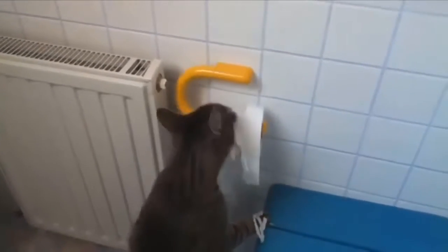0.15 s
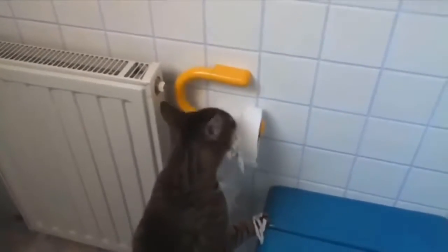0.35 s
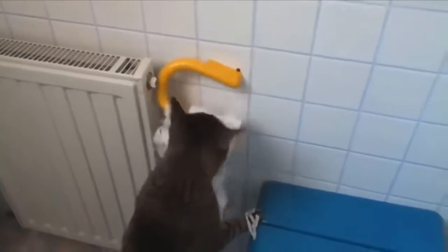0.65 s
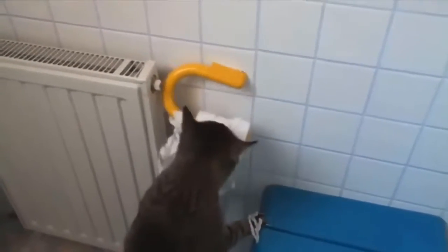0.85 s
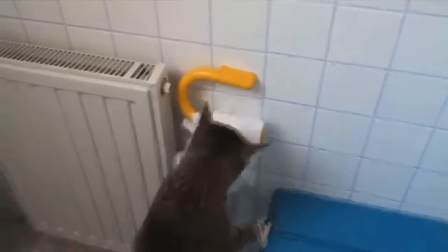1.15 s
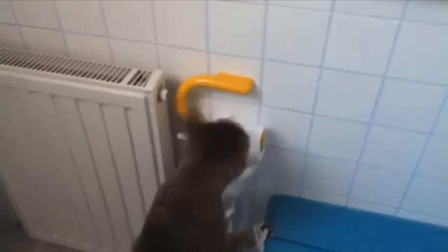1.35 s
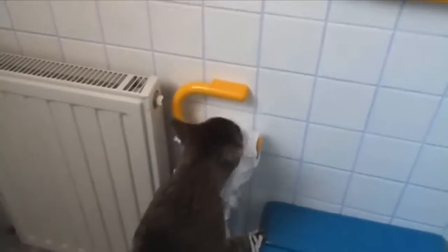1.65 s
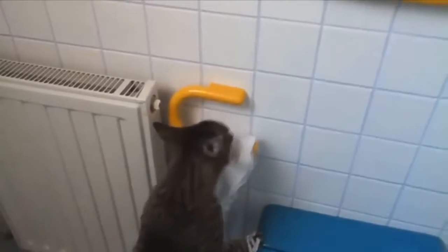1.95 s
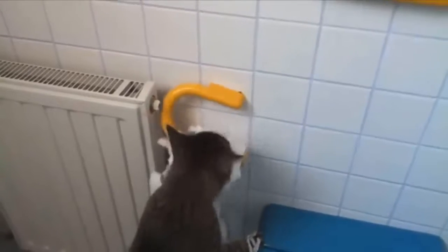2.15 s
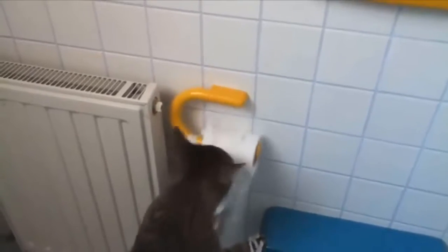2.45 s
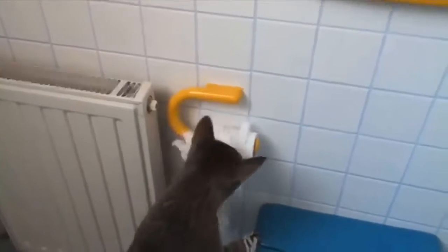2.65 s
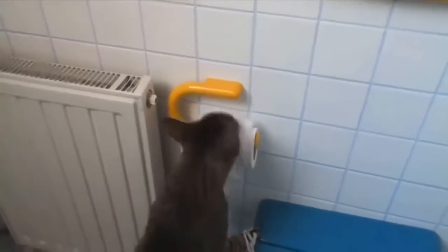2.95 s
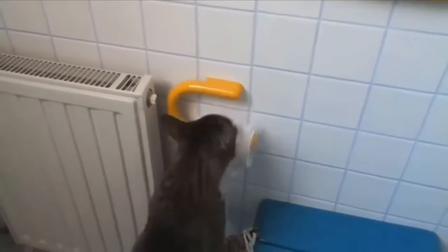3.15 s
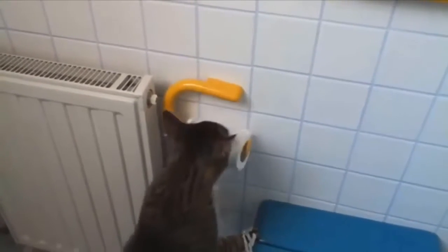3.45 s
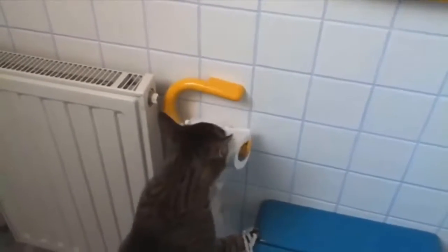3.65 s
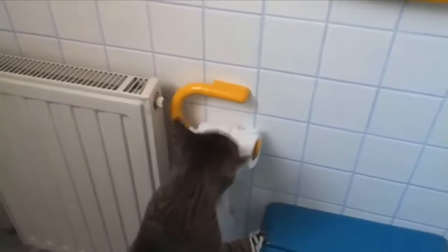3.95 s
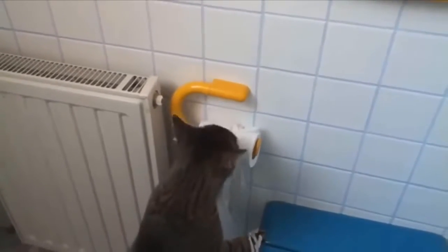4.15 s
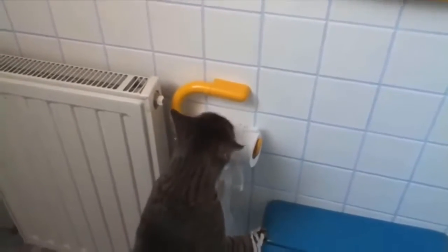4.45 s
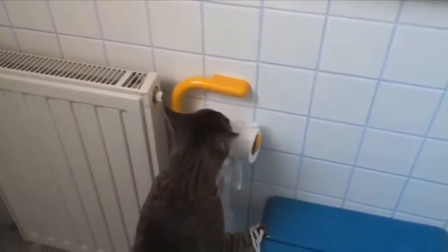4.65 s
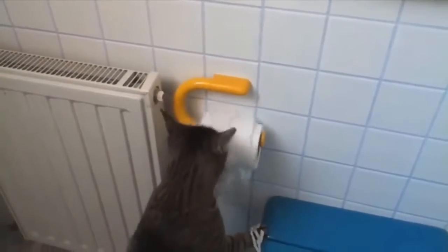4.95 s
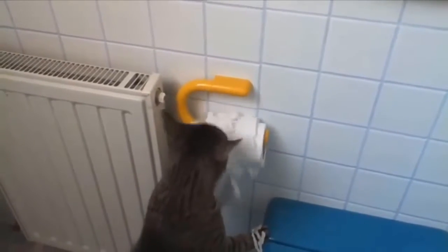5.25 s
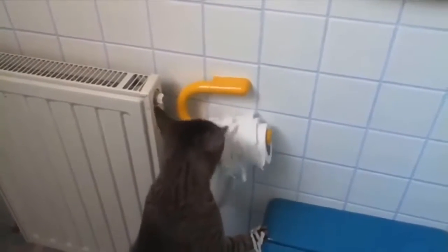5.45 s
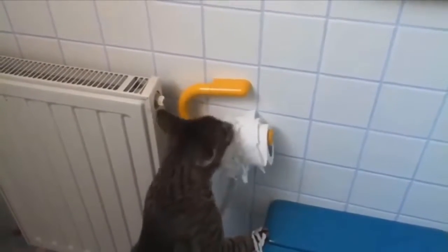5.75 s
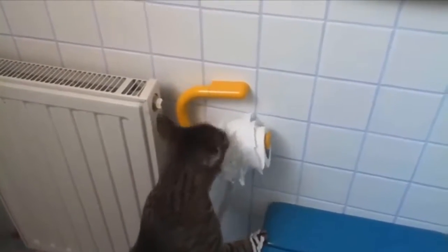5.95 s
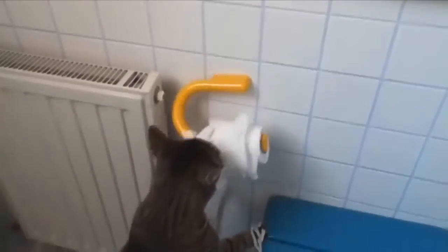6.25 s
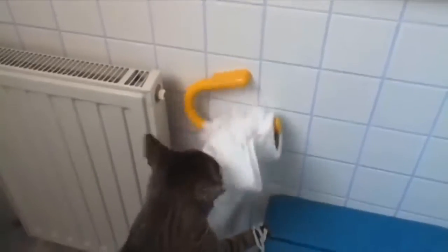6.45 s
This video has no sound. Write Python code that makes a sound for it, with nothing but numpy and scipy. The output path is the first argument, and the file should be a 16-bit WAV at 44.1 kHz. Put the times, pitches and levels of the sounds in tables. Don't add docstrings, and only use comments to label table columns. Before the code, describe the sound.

A cat paws at a toilet roll on a plastic wall holder. Quick tearing swipes and thuds open, then lighter dragging rustles with hollow cardboard scrapes. Hard clunks return around 1.6, 2.8, 4.2 and 5.5 seconds, with dry claw ticks between. A small tiled room adds a short echo; a phone microphone adds low, steady hiss, faint high whistles and one soft finger tap.

```python
import sys
import numpy as np
from scipy import signal
from scipy.fft import rfft, irfft
from scipy.io import wavfile

SR = 44100
rng = np.random.default_rng(int(sys.argv[2]) if len(sys.argv) > 2 else 0)


def voltage_ratio(level):
    return 10 ** (np.asarray(level, float) / 20)


def persist_wave(psi):
    counts = np.round(np.clip(psi, -1, 1) * 32767).astype(np.int16)
    wavfile.write(sys.argv[1], SR, np.atleast_2d(counts).T)


N = 291060
STEP = 32


def rms_one(x):
    return x / np.sqrt(np.mean(x ** 2) + 1e-20)


def at_hz(points, hz):
    points = np.array(points)
    return np.interp(np.log(hz), np.log(points[:, 0]), points[:, 1])


def drift(rate_hz):
    r = np.exp(-80 * np.pi * rate_hz / SR)
    slow = signal.lfilter([1], [1, -2 * r, r * r], rng.standard_normal(N // 40 + 2002))[2000:]
    return np.interp(np.arange(N) / 40, np.arange(len(slow)), rms_one(slow))


def ring(x, hz, t60_s):
    r = voltage_ratio(-60 / (t60_s * SR))
    w = 2 * np.pi * hz / SR
    return signal.lfilter([0, np.sin(w)], [1, -2 * r * np.cos(w), r * r], x + 1e-18)


def bands(x, low_hz, count):
    edges_hz = low_hz * 2 ** (np.arange(count + 1) / 3)
    for k, (low, high) in enumerate(zip(edges_hz, edges_hz[1:])):
        sos = signal.butter(2, [low, high], "band", fs=SR, output="sos")
        yield np.sqrt(low * high), (-1) ** k * signal.sosfilt(sos, x)


def grains(per_s, spread_db):
    sizes = voltage_ratio(spread_db * np.minimum(rng.exponential(1, N), 2.2)) * rng.choice([-1, 1], N)
    return rms_one(sizes * (rng.random(N) < per_s / SR))


def microphone_noise():
    # frequency in Hz, hiss density in dB.
    hiss_curve = [(15, -42), (25, -13), (63, 4.5), (102, 5.5), (309, 2), (460, -5), (761, -11.5),
                  (1290, -10), (2080, -14.5), (2440, -10.5), (7420, -12.5), (11300, -17), (13300, -20.5),
                  (15500, -17.5)]
    # frequency in Hz, level in dB rms.
    whistles = [
        (11084, -83),
        (14979, -73),
    ]
    hz = np.maximum(np.fft.rfftfreq(N, 1 / SR), 10)
    spectrum = rfft(rng.standard_normal(N)) * voltage_ratio(at_hz(hiss_curve, hz))
    hiss = rms_one(irfft(spectrum, N))
    t = np.arange(N) / SR
    tones = sum(np.sqrt(2) * voltage_ratio(db) * np.sin(2 * np.pi * tone_hz * t) for tone_hz, db in whistles)
    return voltage_ratio(-56.5) * hiss + tones


def holder(shaking_db, blows):
    # time in seconds, peak in dB, pitch in Hz.
    thuds = [(0.001, -22.5, 296), (0.136, -27, 405), (0.202, -20.5, 383), (0.276, -19, 327),
             (1.643, -14.5, 307), (1.657, -13.5, 194), (1.678, -19, 280), (1.726, -30, 182),
             (1.751, -30, 70), (2.859, -24, 70), (5.499, -26, 70), (1.42, -34.5, 130), (2.845, -21.5, 368),
             (2.918, -16, 316), (3.036, -20, 263), (4.275, -21.5, 368), (5.461, -24.5, 262),
             (5.495, -24, 298), (5.717, -33, 280), (5.741, -23.5, 300), (6.576, -30.5, 370)]
    # frequency in Hz, level in dB, t60 in seconds.
    wall_modes = [(63, -5, 0.2), (129, -27, 0.2), (161, -32, 0.2), (188, -12.5, 0.2), (223, -17, 0.19),
                  (248, -18, 0.11), (273, -3, 0.14), (286, -10.5, 0.15), (313, 1.5, 0.1),
                  (337.4, -1, 0.071), (368, 5, 0.079), (460, -7.5, 0.062), (519, -15, 0.1),
                  (593, -12, 0.06)]
    longest_s = .14
    rumble = voltage_ratio(shaking_db - 43.5) * grains(600, spread_db=-1.0) + voltage_ratio(-45.0) * blows
    at = [round(row[0] * SR) for row in thuds]
    peak_db = np.array(thuds)[:, 1]
    chance = rng.standard_normal((len(thuds), len(wall_modes)))
    out = np.zeros(N)
    for (hz, db, t60_s), own in zip(wall_modes, chance.T):
        near_db = [-8 * abs(np.log2(hz / thud_hz)) for _, _, thud_hz in thuds]
        pushes = np.zeros(N)
        pushes[at] = voltage_ratio(peak_db + near_db + 2.0 * own - 12.5)
        out += voltage_ratio(db) * ring(pushes + rumble, hz, min(t60_s, longest_s))
    padded = signal.butter(1, 700, fs=SR, output="sos")
    return signal.sosfilt(padded, out)


def swell(s, db, rise_s, fall_s):
    late = np.arange(0, N + STEP, STEP) / SR - s
    down_db = 20 * np.where(late < 0, -late / rise_s, late / fall_s)
    return voltage_ratio(2 * (db - down_db)) + 1e-30


def pawing():
    # peak in seconds, paper level in dB, rise and fall in seconds, brightness in dB at 5 kHz.
    swipes = [(.002, -39.5, 0.016, 0.22, -3.5), (0.119, -27, 0.017, 0.2, -13),
              (.194, -36.5, 0.052, 0.12, -8), (0.261, -26.5, 0.0089, 0.069, -21.5),
              (.33, -45, .1, 0.045, -15.5), (1.586, -42, 0.0033, 0.018, -9), (1.6, -32, 0.013, 0.12, -7),
              (1.618, -30.5, 0.026, 0.08, -1.5), (1.645, -28, 0.056, 0.051, -4.5),
              (1.703, -39, 0.014, 0.12, -8.5), (2.79, -43, 0.037, 0.038, 12),
              (2.802, -24, 0.015, 0.18, -13), (2.908, -25.5, 0.11, 0.023, -12),
              (2.994, -54, .06, 0.067, -10), (3.035, -35.5, 0.13, 0.057, -9),
              (3.816, -37, 0.0033, 0.07, -7), (4.08, -26, 0.025, 0.038, -14),
              (4.228, -25.5, 0.018, 0.073, -6.5), (4.258, -31, 0.044, 0.031, -9),
              (4.29, -53, 0.06, 0.53, -8.5), (5.392, -46, .012, 0.27, 39), (5.48, -34.5, 0.35, 0.15, -8.5),
              (5.721, -37, 0.021, 0.087, -9), (5.77, -48, 0.15, 0.17, -1.5),
              (6.095, -46.5, 0.0033, 0.17, -1.5), (6.548, -36.5, 0.057, 0.85, -6)]
    drags = [(.655, -42.5, 0.023, 0.05, -23), (.682, -47.5, .006, .3, -19.5), (.826, -40.5, 0.28, 0.33, -8),
             (.94, -47.5, 0.94, 0.031, -6.5), (1.102, -46, 0.16, 0.23, -5), (1.342, -50, 0.68, 0.13, -4.5),
             (1.37, -44.5, 0.0078, 0.26, -5), (1.41, -41.5, 0.11, 0.041, -2.5),
             (1.28, -42.5, .05, .05, -4.5), (1.045, -49, 0.033, 0.04, 2), (2.199, -44, 0.12, 0.058, -7.5),
             (2.425, -46.5, 0.15, 0.27, 0.5), (2.483, -39.5, 0.088, 0.17, -8),
             (2.585, -39, 0.11, 0.063, -11), (3.428, -48.5, 0.3, 0.11, -9), (3.77, -37.5, 0.22, 0.15, -8.5),
             (4.065, -42, 0.11, 0.039, -3), (4.205, -44, 0.45, .05, -7), (4.602, -53, 0.032, 0.23, -8),
             (4.836, -52, 0.25, 0.25, -12.5), (4.37, -43.5, 0.35, 0.1, -4.5), (5.695, -47, 0.11, .1, -4),
             (5.88, -46, 0.27, 0.084, -4), (6.256, -50, 0.75, 0.94, -9.5), (6.404, -46, 0.29, 0.22, -8),
             (6.5, -51.5, .3, 0.15, 1)]
    scours = [
        (.55, -45, 0.14, 0.13, -11),
        (2.33, -48.5, 0.11, 1, -11.5),
        (2.687, -46, 0.52, 0.14, -6),
        (4.982, -46, 0.099, 0.18, -19),
        (5.194, -43.5, 0.25, 1, -16.5),
        (5.34, -45.5, 0.6, 0.18, 3),
    ]
    # peak in seconds, paper level in dB, fall in seconds, brightness in dB at 5 kHz.
    pats = [
        (.496, -61, 0.1, -29),
        (1.891, -51, 0.15, -10.5),
        (2.057, -38.5, 0.054, -8.5),
        (3.306, -47.5, 1, -7),
        (3.556, -46.5, 0.37, -11),
        (3.924, -35, 0.076, -9.5),
        (6.006, -49, 0.16, -6.5),
        (6.432, -40, 0.092, -2.5),
    ]
    # peak in seconds, level in dB, rise and fall in seconds.
    shakes = [(.002, -32, .01, 0.18), (.062, -48, .03, 0.071), (.16, -22, 0.05, 0.14),
              (.248, -22, 0.097, 0.028), (.288, -19, 0.056, 0.1), (.35, -39, .05, 0.087),
              (1.102, -38, 0.13, 0.15), (1.639, -12.5, 0.028, 0.027), (2.199, -44, 0.057, 0.044),
              (2.82, -17, 0.017, 0.18), (2.908, -47, 0.17, 0.11), (3.042, -20, 0.11, .08),
              (3.791, -59, 0.6, 0.032), (4.075, -49, .02, 0.13), (4.234, -19.5, 0.0098, 0.12),
              (5.472, -30, 0.027, 0.29), (5.713, -19, 0.0051, 0.013), (5.743, -23.5, 0.021, 0.095),
              (6.094, -41.5, 0.039, 0.063), (6.404, -41.5, 0.27, 0.044), (6.57, -54, 0.025, .3)]
    pat_rise_s = 0.039
    full_pats = [(s, db, pat_rise_s, fall_s, bright_db) for s, db, fall_s, bright_db in pats]
    kinds = [(swipes, -6), (drags, -0.5), (scours, 3.5), (full_pats, 0.5)]
    power, bright, core = 0, 0, 0
    for strokes, core_db in kinds:
        for s, db, rise_s, fall_s, bright_db in strokes:
            one = swell(s, db, rise_s, fall_s)
            power = power + one
            bright = bright + one * bright_db
            core = core + one * core_db
    shaking = voltage_ratio(2 * -7.5) * power + sum(swell(*row) for row in shakes)
    controls = 10 * np.log10(power), bright / power, 10 * np.log10(shaking), core / power
    return [np.interp(np.arange(N) / STEP, np.arange(len(c)), c) for c in controls]


def paper(level_db, bright_db, core_db):
    # frequency in Hz, density in dB per Hz.
    rustle = [(210, -30), (350, 8.5), (479, 6), (1440, 3), (1660, 14.5), (1820, 8), (3020, 4), (4000, -5),
              (4760, -4), (5840, -8.5), (8380, -12.5), (14300, -28), (15000, -31)]
    # frequency in Hz, width in Hz, level in dB.
    core_modes = [
        (1060, 190, -28),
        (1250, 140, -16),
        (1470, 175, -11),
        (1750, 440, -8.5),
        (2290, 330, -12.5),
    ]
    flutter_db = 1.5 * drift(30) + 1.2 * drift(12)
    snapping = np.clip((level_db + 56) / 16, .3, 1)
    snaps = grains(900 * voltage_ratio(4 * drift(25)), spread_db=3.5)
    fibres = rng.standard_normal(N) + snapping * snaps
    fibres *= voltage_ratio(level_db + flutter_db) / np.sqrt(1 + snapping ** 2)

    hollow = voltage_ratio(1.01 * np.clip(core_db, -12, 4) + 6)
    hollow_ring = sum(voltage_ratio(db - 25) * ring(fibres, hz, 1.16 / width_hz) for hz, width_hz, db in core_modes)
    fibres = (fibres + hollow * hollow_ring) / np.sqrt(1 + hollow ** 2)

    out = np.zeros(N)
    for hz, part in bands(fibres, 334.0, count=16):
        patch_db = 1.6 * drift(6)
        reach = np.clip(np.log2(hz / 1600) / 1.21, 0, 1.1)
        lift_db = reach * (bright_db + 7.5 + 20 * np.log10(1 + hollow ** 2) / 2)
        thin_db = -7 * np.clip(np.log2(1000 / hz), 0, 1) * np.clip((-27.0 - level_db) / 8, 0, 1)
        out += part * voltage_ratio(at_hz(rustle, hz) + lift_db + thin_db + patch_db)
    return out


def bathroom(x):
    # frequency in Hz, t60 in seconds.
    decay = [
        (250, 0.38),
        (1000, 0.24),
        (3000, 0.084),
        (9000, 0.061),
    ]
    t = np.arange(SR // 2) / SR
    tail = 0
    for hz, part in bands(rng.standard_normal(len(t)), 107.2, count=21):
        tail = tail + part * voltage_ratio(-60 * t / at_hz(decay, hz))
    tail = tail * np.clip((t - .004) / 0.0015, 0, 1)
    return signal.fftconvolve(x, tail / np.sqrt(np.sum(tail ** 2)))[:N]


def claw_ticks():
    # time in seconds, peak in dB, pitch in Hz, cycles of ring.
    dry_ticks = [(.064, -20, 900, 1.2), (.1793, -13, 1900, 1.2), (.496, -36, 2100, 2.5),
                 (.26, -19, 1850, 4), (2.41, -30, 1010, 3), (5.72, -27, 1260, 2.5), (2.056, -35, 2240, 2),
                 (3.552, -41, 816, 2), (1.045, -37, 2500, 1.2), (.651, -40, 2000, 1.5),
                 (.678, -29, 1450, 1.8), (1.584, -30, 2600, 1.2), (1.701, -22, 1310, 1.6),
                 (2.984, -20, 1600, 1.4), (3.013, -23, 1500, 1.4), (3.8135, -18, 1760, 10),
                 (3.8135, -33, 5000, 8), (1.367, -35, 2290, 2), (5.388, -30, 1770, 3),
                 (4.07, -21, 600, 1.6), (4.588, -43, 1300, 1.6), (4.701, -39, 1940, 1.6),
                 (5.428, -24, 1280, 1.5), (5.569, -25, 1770, 2), (5.951, -39, 2230, 1.6),
                 (6.0925, -28, 1500, 1), (6.541, -24, 1000, 1.3)]
    pings = [
        (2.8726, -36, 5600, 26),
        (2.892, -28, 5500, 18),
    ]
    events = dry_ticks + pings
    t = np.arange(600) / SR
    fizz = rng.standard_normal((len(events), len(t)))
    out = np.zeros(N)
    for (s, db, hz, cycles), rough in zip(events, fizz):
        spike = np.sin(2 * np.pi * hz * t) * np.exp(-(t * hz / cycles) ** 1.6)
        tick = spike + .3 * rough * np.exp(-t / .0012)
        i = round((s + .002) * SR)
        out[i:i + len(t)] += voltage_ratio(db) * tick / np.max(np.abs(tick))
    return signal.sosfilt(signal.butter(4, 7500, fs=SR, output="sos"), out)


def knocks():
    # time in seconds, peak in dB, ring in Hz, crack share in dB.
    hard = [(0.12, -31, 1870, 4.5), (0.18, -22, 1186, -6), (0.184, -20, 1275, 1), (0.263, -20, 1256, -36),
            (1.627, -25, 690, -10), (1.634, -18.5, 1530, -10), (1.643, -46, 506, -18),
            (2.8, -9.5, 1000, -14.5), (2.803, -11.5, 566, -20), (2.871, -21, 890, -13),
            (4.071, -25, 735, -12), (4.072, -27, 1690, -8), (4.222, -24, 1064, -8), (5.39, -27, 1930, -14),
            (5.723, -33, 1350, -21), (6.094, -39, 500, 10.5), (6.245, -39, 747, -17),
            (6.429, -30, 3270, -13), (6.541, -41, 1920, -21)]
    # time in seconds, peak in dB, ring in Hz.
    bumps = [(0.275, -21, 750), (0.496, -32.5, 2120), (0.31, -33, 910), (1.62, -39, 850),
             (2.409, -46, 1080), (2.838, -18, 538), (2.894, -22.5, 550), (2.984, -24, 1310),
             (3.013, -27.5, 730), (3.55, -39.5, 807), (3.823, -34, 1730), (4.242, -27, 800),
             (5.464, -36, 1000), (5.491, -22.5, 2515), (5.572, -35, 1670)]
    arm_hz = [540, 720, 805, 915, 1030, 1270, 1510, 1590, 1800, 1940, 2280, 2780, 3300, 3890, 4470, 5450]
    # t60 in seconds, crack in dB, fall of neighbouring modes in dB per octave
    contacts = [(s, db, hz, .046, crack_db, 6) for s, db, hz, crack_db in hard]
    contacts += [(s, db, hz, .045, -25, 8) for s, db, hz in bumps]
    t = np.arange(5000) / SR
    grit = rng.standard_normal((len(contacts), len(t)))
    chance = rng.standard_normal((len(contacts), len(arm_hz)))
    modes = np.array(arm_hz)[:, None]
    dulled_db = -8 * np.maximum(np.log2(modes / 1800), 0)
    edge = signal.butter(2, [700, 6000], "band", fs=SR, output="sos")
    out = np.zeros(N)
    for (s, db, hz, t60_s, crack_db, narrow_db), rough, own in zip(contacts, grit, chance):
        own = own[:, None]
        near_db = -narrow_db * np.abs(np.log2(modes / hz))
        woken = voltage_ratio(dulled_db + near_db + 5.2 * own - 5.5) * np.sign(own)
        lasting_s = t60_s * np.sqrt(hz / modes)
        body = np.sum(woken * voltage_ratio(-60 * t / lasting_s) * np.sin(2 * np.pi * modes * t), axis=0)
        body += voltage_ratio(-60 * t / t60_s) * np.sin(2 * np.pi * hz * t)
        body *= (1 - np.exp(-t / .0003)) / np.max(np.abs(body))
        shape = np.exp(-t / .0005) + .2 * voltage_ratio(-25 * t / t60_s)
        crack = voltage_ratio(crack_db) * shape * rms_one(signal.sosfilt(edge, rough))
        i = round(s * SR)
        out[i:i + len(t)] += voltage_ratio(db) * (body + crack)[:N - i]
    return signal.sosfilt(signal.butter(2, 6500, fs=SR, output="sos"), out)


def scrapes():
    # peak in seconds, level in dB, rise and fall in seconds (for 20 dB), pitch in Hz.
    songs = [(.535, -50, .03, .08, 1450), (.745, -48, .06, .06, 1450), (.818, -38, .035, .015, 1430),
             (.855, -40, .025, .02, 1450), (.84, -47, .06, .08, 1050), (.82, -48, .12, .12, 2090),
             (.91, -48, .02, .07, 1380), (.32, -34, .04, .06, 900), (.29, -35, .02, .06, 650),
             (.15, -34, .03, .04, 1250), (4.08, -36, .008, .07, 800), (3.03, -37, .02, .05, 800),
             (1.735, -40, .03, .04, 1250), (1.105, -46, .06, .08, 830), (1.39, -45, .03, .08, 2270),
             (2.36, -48, .08, .08, 1300), (2.49, -44, .05, .04, 1250), (2.58, -46, .03, .05, 1900),
             (2.68, -50, .1, .08, 1400), (3.4, -51, .1, .1, 1300), (3.83, -37, .012, .1, 1790),
             (4.98, -44, .06, .07, 1450), (4.99, -47, .08, .04, 1880), (5.19, -44, .05, .1, 1200),
             (5.26, -44, .1, .08, 1450), (5.29, -47, .1, .08, 1800), (5.335, -40, .012, .05, 1280),
             (5.4, -40, .08, .06, 1080), (5.465, -36, .06, .05, 960), (5.47, -41, .08, .05, 3000),
             (6.44, -46, .03, .04, 2000)]
    width, slide = .09, .04
    late = np.arange(-9000, 9000) / SR
    half = len(late) // 2
    out = np.zeros(N + len(late))
    rough = rng.standard_normal((len(songs), 2, len(late)))
    wander = np.pad(drift(6), half, "edge")
    for (s, db, rise_s, fall_s, hz), pair in zip(songs, rough):
        i = round(s * SR)
        slow = rms_one(signal.sosfilt(signal.butter(2, width * hz, fs=SR, output="sos"), pair))
        phase = 2 * np.pi * hz * np.cumsum(1 + slide * wander[i:i + len(late)]) / SR
        shape = voltage_ratio(db - 20 * np.where(late < 0, -late / rise_s, late / fall_s))
        out[i:i + len(late)] += shape * (slow[0] * np.sin(phase) + slow[1] * np.cos(phase))
    return out[half:half + N]


def phone_tap():
    # time in seconds, peak in dB, pitch in Hz, half length in seconds.
    tap = (.5805, -32, 500, .001)
    s, db, hz, half_s = tap
    late = np.arange(N) / SR - s
    shape = np.exp(-np.minimum((late / half_s) ** 2, 60))
    pop = np.cos(2 * np.pi * hz * late) + .12 * np.sin(2 * np.pi * 3800 * late)
    return voltage_ratio(db) * shape * pop


def scene():
    level_db, bright_db, shaking_db, core_db = pawing()
    blows = knocks()
    ticks = claw_ticks()
    sheet = paper(level_db, bright_db, core_db) + scrapes()
    arm = holder(shaking_db, blows)

    sent = voltage_ratio(-8) * blows + voltage_ratio(-13) * ticks + voltage_ratio(-13.0) * sheet
    no_bass = signal.butter(2, 420, "high", fs=SR, output="sos")
    wet = bathroom(signal.sosfilt(no_bass, sent) + voltage_ratio(-15.0) * arm)
    no_deep_bass = signal.butter(2, 85, "high", fs=SR, output="sos")
    wall = signal.sosfilt(no_deep_bass, blows + ticks + sheet + arm + wet)
    return (wall + phone_tap() + microphone_noise())[None]


def low_pass(x):
    return signal.sosfilt(signal.butter(12, 15580, fs=SR, output="sos"), x)


def record(dry):
    skip_s, skip_drop_db, recover_s = 4.7418, -20, .013
    late = np.arange(N) / SR - skip_s
    skip_db = np.where(late < 0, 0, skip_drop_db * np.clip(1 - late / recover_s, 0, 1) ** 1.3)
    return low_pass(dry * voltage_ratio(skip_db))


dry = scene()
out = record(dry)
persist_wave(out)
```